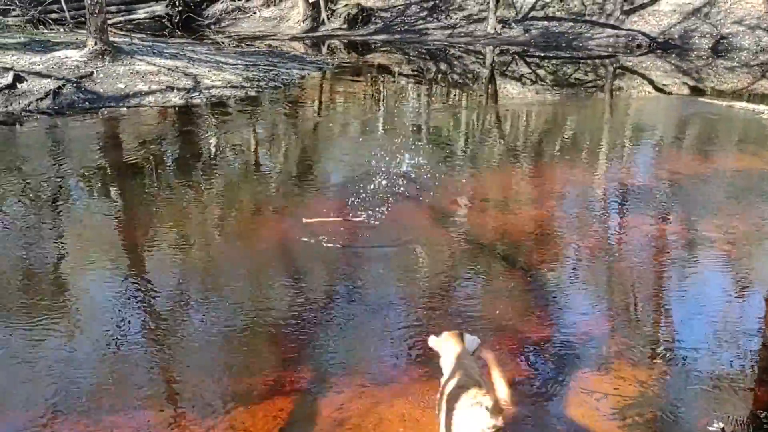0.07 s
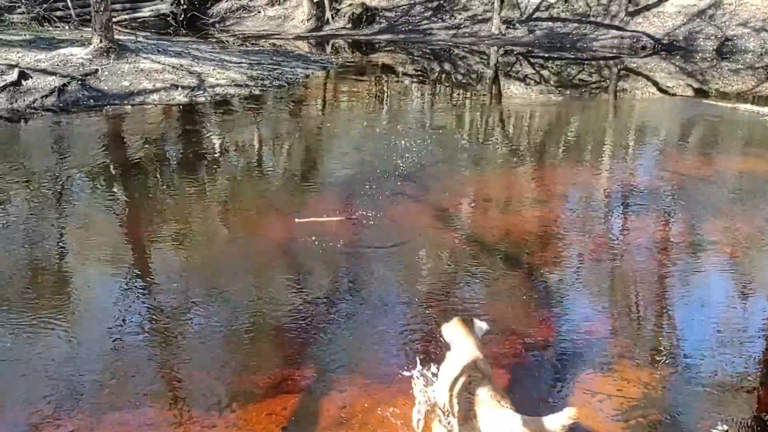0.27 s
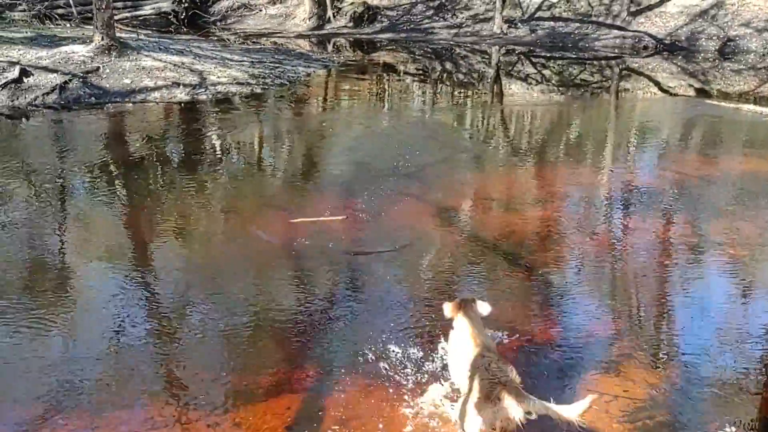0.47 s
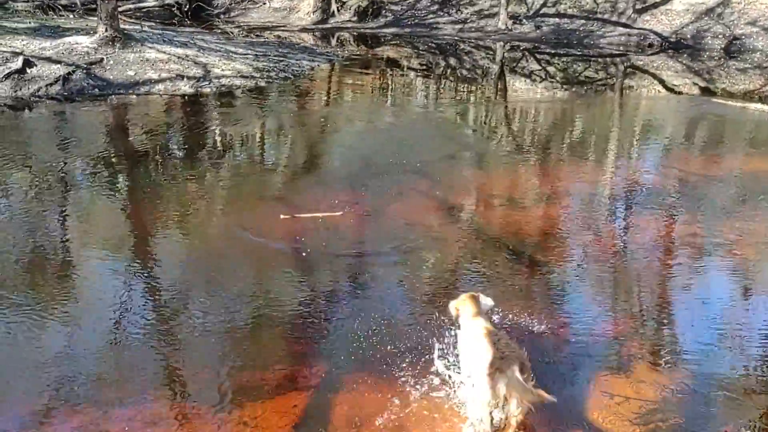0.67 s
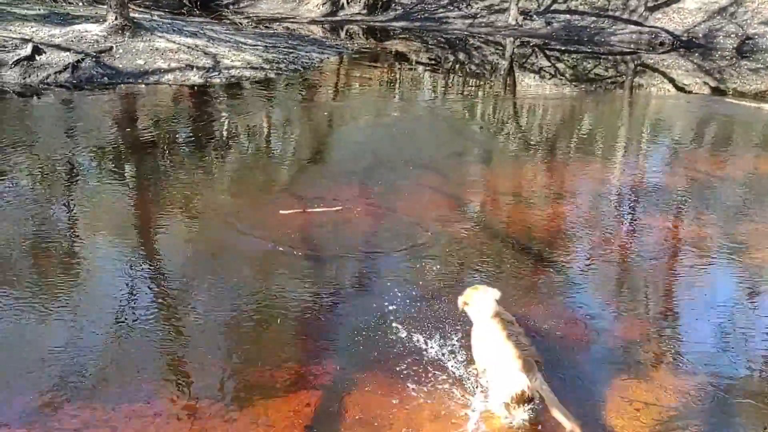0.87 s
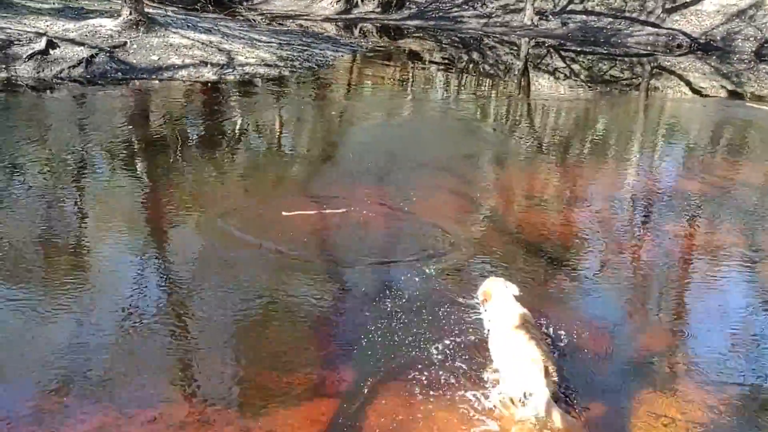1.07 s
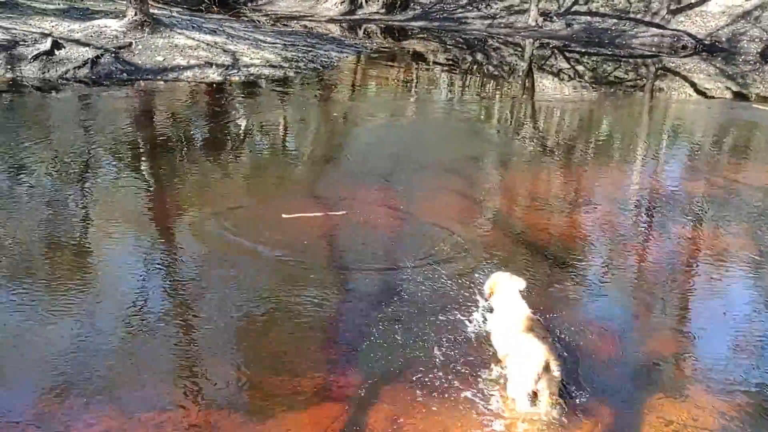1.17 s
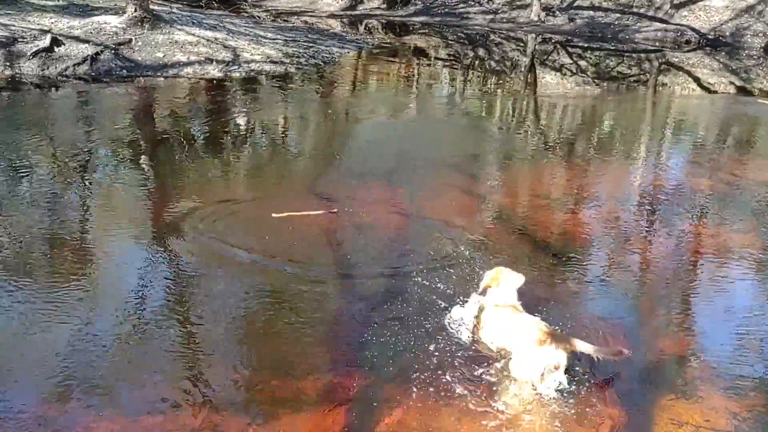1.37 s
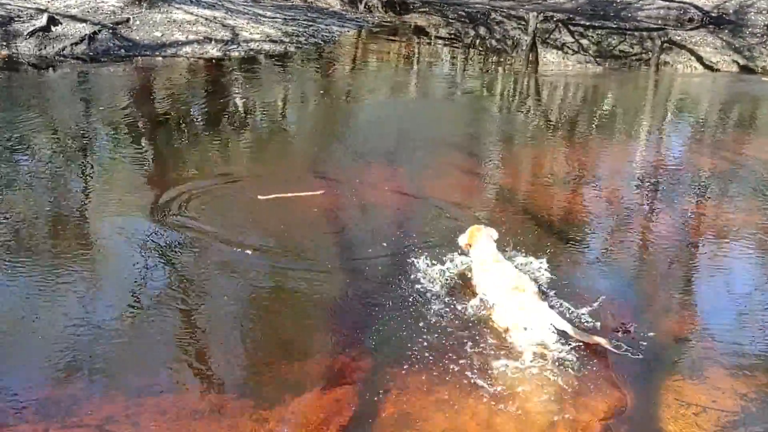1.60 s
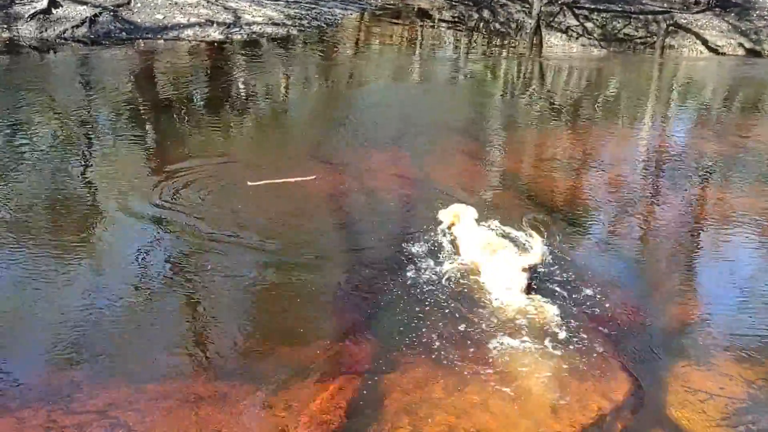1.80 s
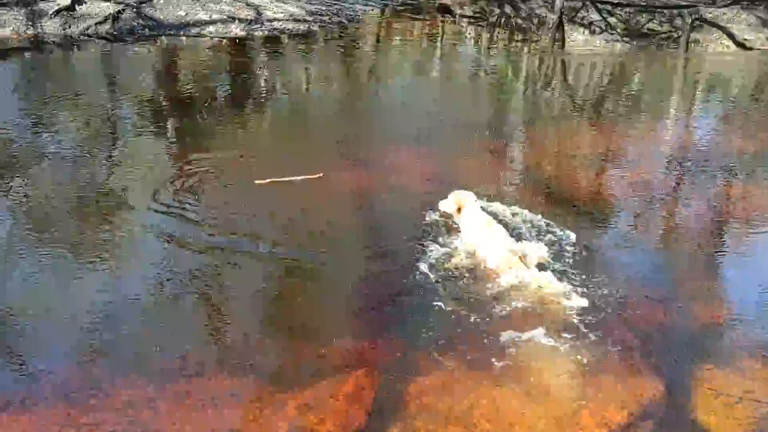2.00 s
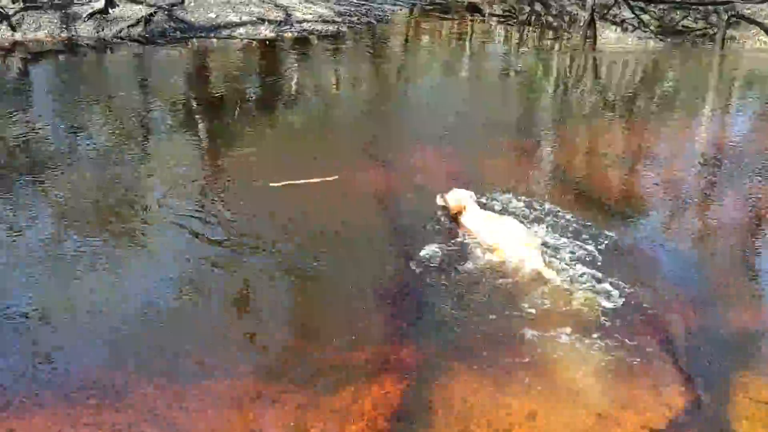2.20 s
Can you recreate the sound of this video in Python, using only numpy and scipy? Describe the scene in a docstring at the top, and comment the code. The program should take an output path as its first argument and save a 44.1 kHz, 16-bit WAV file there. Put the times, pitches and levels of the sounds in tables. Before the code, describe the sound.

A dog bounds through river shallows with a sharp splash, then sloshes and gurgles into swimming

```python
"""On a calm river, a dog bounds from the shallows and starts to swim.
Paws slap the surface as short bursts of filtered noise; trapped air rings as dying, gliding sines.
Mist, patter, drips and churn are random grains through resonators; sloshing is many gliding bubbles.
The banks return a faint echo by convolution with decaying noise, over a steady hush of shaped noise."""
import sys
import numpy as np
from scipy import signal
from scipy.fft import rfft, irfft
from scipy.io import wavfile

SR = 44100
rng = np.random.default_rng(int(sys.argv[2]) if len(sys.argv) > 2 else 0)


def to_wav(s):
    """Save 16-bit WAV."""
    ch = np.atleast_2d(s).T  # columns
    pcm = np.round(np.clip(ch, -1, 1) * 32767)  # PCM
    wavfile.write(sys.argv[1], SR, pcm.astype(np.int16))


N = 99225
TIME = np.arange(N) / SR   # s
ONSET_CYCLES = 0.87   # cycles for a bubble to reach full swing
MEAN_RISE, GLIDE_SPREAD = 0.091, 0.17   # share of pitch gained over one t60, and its scale of variation


def from_db(db):
    """Amplitude gain follows the decibel law, 20 dB per factor of ten."""
    return 10 ** (np.asarray(db) / 20)


def rms_one(x):
    """Normalisation to unit mean square power."""
    return x / np.sqrt(np.mean(x ** 2) + 1e-20)


def level(rows):
    """Envelope: gain over time, interpolated in decibels between (s, dB) points."""
    return from_db(np.interp(TIME, *np.transpose(rows)))


def at_hz(points, hz):
    """Spectral colour in dB, interpolated on a logarithmic frequency axis."""
    point_hz, db = np.transpose(points)
    return np.interp(np.log(hz), np.log(point_hz), db)


def band_pass(x, order, edges_hz):
    """Band limitation by a Butterworth filter."""
    return signal.sosfilt(signal.butter(order, edges_hz, "band", fs=SR, output="sos"), x)


def band_noise(edges_hz):
    """Band-limited white noise of unit power."""
    return rms_one(band_pass(rng.standard_normal(N), 2, np.sort(edges_hz)))


def burst(start, attack, decay):
    """Transient envelope: a straight rise, then an exponential fall; all times in s."""
    age = TIME - start
    rise = np.clip(age / attack, 0, 1)
    return rise * np.exp(-np.clip((age - attack) / decay, 0, 60))


def grains(colour, per_s, cycles, spread_db, count):
    """Impulsive excitation of resonators: random births ring at count pitches, losing 60 dB in cycles."""
    out = np.zeros(N)
    for hz in np.geomspace(colour[0][0], colour[-1][0], count):
        born = rng.random(N) < per_s / count / SR
        sizes_db = spread_db * np.minimum(rng.exponential(1, N), 3.5)
        sizes = from_db(sizes_db) * rng.choice([-1, 1], N)
        # A pole pair just inside the unit circle sets the pitch and the decay.
        radius = from_db(-60 * hz / (cycles * SR))
        angle = 2 * np.pi * hz / SR
        poles = [1, -2 * radius * np.cos(angle), radius * radius]
        rings = signal.lfilter([1, -1], poles, born * sizes + 1e-18)
        rings = band_pass(rings, 1, [hz / 2, min(hz * 2, SR / 3)])
        # Log-spaced bands widen with pitch: sqrt(hz) turns dB per Hz into band amplitude.
        out += from_db(at_hz(colour, hz)) * np.sqrt(hz) * rms_one(rings)
    return rms_one(out)


def open_air():
    """Stationary random noise: the steady hush of the riverside, coloured in the frequency domain."""
    # hush of the air: (frequency [Hz], relative level [dB])
    floor_colour = [(25, 15), (60, 1.5), (120, -1), (300, -23.5), (900, -21), (3000, 3), (8000, -12)]
    hz = np.maximum(np.fft.rfftfreq(N, 1 / SR), 1)
    spectrum = rfft(rng.standard_normal(N)) * from_db(at_hz(floor_colour, hz))
    return from_db(-54.5) * rms_one(irfft(spectrum, N))


def mist():
    """Superposed resonances: fine mist fizzes as many tiny, high, lightly damped grains."""
    # swell of the mist: (time [s], level before trim [dB])
    mist_level = [(0, -67), (.19, -63.5), (.26, -47), (.35, -60.5), (.45, -54.5), (.54, -56), (.6, -53.5),
                  (.67, -49.5), (.8, -59), (.99, -56), (1.21, -66), (1.29, -51.5), (1.38, -59),
                  (1.47, -49.5), (1.57, -54), (1.66, -48.5), (1.8, -54.5), (1.88, -58), (1.97, -55.5),
                  (2.25, -60)]
    # colour of the mist: (frequency [Hz], relative level [dB per Hz])
    mist_colour = [(4200, -6), (5300, -9), (5800, -7.5), (6500, -0.5), (7200, 1), (7900, -7)]
    fizzing = grains(mist_colour, per_s=3600, cycles=180, spread_db=5.0, count=28)
    return from_db(-1.5) * level(mist_level) * fizzing


def falling_drops():
    """Damping sets the character: dense drops patter, while sparse, longer-ringing ones drip clearly."""
    # swell of the falling spray: (time [s], level before trim [dB])
    spray_level = [(0, -50), (.13, -52.5), (.19, -50), (.25, -31.5), (.29, -48), (.35, -48), (.5, -48.5),
                   (.63, -40), (.7, -44.5), (.79, -45.5), (.89, -50), (.95, -41.5), (1.02, -42),
                   (1.22, -47.5), (1.44, -44), (1.55, -44.5), (1.66, -37), (1.74, -42), (1.97, -45.5),
                   (2.25, -49.5)]
    # colour of the patter: (frequency [Hz], relative level [dB per Hz])
    spray_colour = [(1150, 5.5), (1450, -3.5), (1800, -10.5), (2250, 7.5), (2600, -4.5), (3000, -1),
                    (3650, -1.5), (4100, -8.5)]
    # colour of the clear drips: (frequency [Hz], relative level [dB per Hz])
    drip_colour = [(1000, -3.5), (1400, 2.5), (2400, -1), (3800, 2.5)]
    patter = from_db(-3.5) * grains(spray_colour, per_s=4200, cycles=32.5, spread_db=1.5, count=64)
    drips = from_db(-7.5) * grains(drip_colour, per_s=280, cycles=85, spread_db=4.5, count=30)
    return level(spray_level) * (patter + drips)


def gurgles():
    """Bubble resonance: size sets each pitch, and the moving surface bends it up or down."""
    # colour of the sloshing: (frequency [Hz], relative level [dB per Hz])
    slosh_colour = [(350, -29.5), (420, -4.5), (500, 2), (740, -0.5), (920, 3.5), (1130, -7), (1420, -5),
                    (1900, -14)]
    bubbles_per_s, ring_cycles, spread_db = 720, 47.5, 0.5
    lowest_hz, highest_hz = slosh_colour[0][0], slosh_colour[-1][0]
    count = int(bubbles_per_s * N / SR)
    out = np.zeros(N + SR)
    for k, (when, size, strength, bend, turn) in enumerate(rng.random((count, 5))):
        hz = lowest_hz * (highest_hz / lowest_hz) ** size
        t60 = min(ring_cycles / hz, .5)
        start = int((k + when) * N / count)
        age = np.arange(int(t60 * SR)) / SR
        rise = MEAN_RISE + 2 * GLIDE_SPREAD * (2 * bend - 1)
        strength_db = spread_db * min(-np.log(1 - strength), 3)
        gain = hz * from_db(at_hz(slosh_colour, hz) + strength_db)
        swing = np.minimum(age * hz / ONSET_CYCLES, 1) * np.exp(-np.log(1000) * age / t60)
        cycles = turn + hz * (age + rise * age ** 2 / (2 * t60))   # turn is the starting phase
        out[start:start + len(age)] += gain * swing * np.sin(2 * np.pi * cycles)
    return rms_one(out[:N])


def slosh():
    """Amplitude modulation: the gurgling swells as water sloshes round the body."""
    # swell of the sloshing: (time [s], level before trim [dB])
    slosh_level = [(0, -60.5), (.19, -70.5), (.26, -51), (.38, -65.5), (.48, -56.5), (.6, -54), (.8, -50.5),
                   (.94, -49.5), (1.05, -46.5), (1.31, -49), (1.43, -43), (1.55, -46), (1.66, -36),
                   (1.71, -43.5), (1.81, -39.5), (1.86, -43.5), (1.98, -44.5), (2.16, -46.5), (2.25, -53.5)]
    return from_db(-0.5) * level(slosh_level) * gurgles()


def churn():
    """Heavily damped low resonances: the legs churn the water below into eddies."""
    # swell of the churning: (time [s], level before trim [dB])
    churn_level = [(0, -73), (.19, -76), (.28, -58), (.36, -69.5), (.7, -65), (1.25, -62.5), (1.39, -62.5),
                   (1.46, -49.5), (1.55, -53.5), (1.66, -40.5), (1.75, -57.5), (1.85, -58.5), (1.96, -48.5),
                   (2.04, -53.5), (2.25, -61.5)]
    # colour of the churning: (frequency [Hz], relative level [dB per Hz])
    churn_colour = [(60, -16), (100, -6), (160, 7.5), (260, 7.5), (350, -1), (480, -18.5)]
    eddies = grains(churn_colour, per_s=380, cycles=5.0, spread_db=4, count=14)
    return from_db(-2.5) * level(churn_level) * eddies


def banks(x):
    """Diffuse reflection: banks and trees scatter a dull, faint echo, convolved as decaying noise."""
    delay_s, attack_s, t60_s = .012, 0.00057, 0.43
    tail = band_noise((200, 4700)) * burst(delay_s, attack_s, t60_s / np.log(1000))
    unit_energy_tail = tail / np.sqrt(np.sum(tail ** 2))
    return from_db(-22) * signal.fftconvolve(x, unit_energy_tail)[:N]


def slaps():
    """Impact noise: paws and lumps of water excite a hollow body, a splash and a fizz under one burst."""
    # hits on the surface: (time [s], splash level [dB], decay [s],
    #   body level re splash [dB], fizz level re splash [dB])
    slap_rows = [(0.0247, -41.5, 0.0032, -19, -19), (0.1047, -42, 0.012, -8, -3),
                 (0.1807, -42, 0.0024, -22, -14), (0.2066, -35.5, 0.011, -11.5, -5.5),
                 (0.2289, -40.5, 0.0047, 2, -15), (0.461, -56, 0.0053, 11.5, 7.5),
                 (0.555, -32, 0.0056, -7.5, -5.5), (0.596, -40.5, 0.0095, -3.5, -15),
                 (0.628, -46, 0.0059, 8, -42), (0.661, -45.5, 0.0086, -29, 0.5),
                 (0.683, -39, 0.011, -30, -17), (0.818, -44, 0.029, 4, -7), (0.899, -44, 0.0073, 3, -23),
                 (0.918, -39.5, 0.014, 5, -30), (0.935, -43, 0.0099, 5.5, -17),
                 (1.06, -39.5, 0.0045, -7, -9.5), (1.129, -41.5, 0.019, 0, -10.5),
                 (1.256, -40, 0.017, -19, -4), (1.3, -45, 0.0057, 11, -4), (1.431, -38, 0.026, -2.5, -30),
                 (1.484, -40.5, 0.016, 7, -15), (1.6382, -40.5, 0.02, -9, -6), (1.673, -34, 0.003, -9, -18),
                 (1.8241, -36.5, 0.0084, 5, -16), (1.9395, -36.5, 0.0076, -16, -30),
                 (1.9585, -40.5, 0.016, 2.5, -10)]
    body = band_noise((516, 1400))
    splash = band_noise((1240, 3500))
    fizz = band_noise((4940, 7900))
    rise_share = 0.12   # attack as a share of the decay
    out = np.zeros(N)
    for start, db, decay, body_db, fizz_db in slap_rows:
        mixture = splash + from_db(body_db) * body + from_db(fizz_db) * fizz
        out += from_db(db) * burst(start, rise_share * decay, decay) * mixture
    return out


def bubble(start, db, hz, t60, rise):
    """Damped oscillation of an air pocket: a dying sine that gains rise of its pitch over one t60."""
    age = np.clip(TIME - start, 0, 2 * t60)
    phase = 2 * np.pi * hz * (age + rise * age ** 2 / (2 * t60))
    return from_db(db) * burst(start, ONSET_CYCLES / hz, t60 / np.log(1000)) * np.sin(phase)


def air_pockets():
    """Volume resonance of trapped air: plunging legs make deep gulps, and large bubbles higher plops."""
    # air pockets under the legs: (time [s], level [dB], pitch [Hz], t60 [s],
    #   pitch gained over one t60 [share])
    gulp_rows = [(.236, -41, 120.8, 0.034, -0.18), (0.278, -51, 307, 0.1, -0.0069),
                 (0.457, -51, 128, 0.02, 0.16), (0.554, -38.5, 175, 0.2, 0.64),
                 (0.622, -38.5, 157.6, 0.073, 0.019), (.821, -33.5, 248, 0.035, 0.13),
                 (.99, -46.5, 253, 0.068, 0.22), (1.298, -33.5, 104, 0.21, .04),
                 (1.298, -36.5, 238, 0.023, .1), (1.574, -35, 212, 0.035, -0.055),
                 (1.598, -45, 167, .04, 0.43), (1.622, -37, 210, 0.028, 0.14),
                 (1.872, -38.5, 244, 0.037, .1), (1.876, -47.5, 150, 0.06, 0.09),
                 (1.917, -48, 237, .04, .1)]
    # single large bubbles: (time [s], level [dB], pitch [Hz], t60 [s])
    plop_rows = [(.209, -29, 1010, 0.043), (.229, -34.5, 884, 0.059), (0.312, -34.5, 1480, 0.037),
                 (0.491, -42, 558, 0.096), (.558, -30.5, 2556, 0.062), (.597, -29.5, 1460, 0.047),
                 (.622, -38.5, 720, .035), (0.659, -29.5, 973, 0.045), (.757, -40, 574, 0.14),
                 (.817, -32.5, 927, 0.03), (.85, -39, 710, 0.064), (.868, -33, 496, 0.056),
                 (.899, -36, 1027, 0.043), (0.9183, -37, 878, 0.11), (1.005, -40, 945, 0.047),
                 (1.025, -33, 5340, 0.0092), (1.058, -28.5, 926, 0.016), (1.187, -36, 913, 0.079),
                 (1.239, -34.5, 756, 0.036), (1.3411, -31.5, 1370, 0.038), (1.374, -35.5, 507, 0.079),
                 (1.402, -35, 499, 0.11), (1.502, -38, 787, 0.02), (1.634, -29.5, 490, 0.036),
                 (1.648, -30.5, 640, 0.066), (1.671, -27.5, 880, 0.016), (1.761, -37, 972, 0.1),
                 (1.808, -25, 535, 0.022), (1.878, -33, 423, 0.034), (1.947, -32, 455, 0.017)]
    rises = rng.normal(MEAN_RISE, GLIDE_SPREAD / 2, len(plop_rows))
    gulps = sum(bubble(*row) for row in gulp_rows)
    plops = sum(bubble(*row, rise) for row, rise in zip(plop_rows, rises))
    return gulps + plops


def smack():
    """Modal ringing: one flat hit traps small bubbles that crack almost at once, with a noise splash."""
    # cracking bubbles: (delay after the hit [s], pitch [Hz], level before trim [dB], t60 [s])
    ring_rows = [(0, 1066, -1.5, .014), (0, 1400, -9.5, .022), (0, 2090, 1.5, .016),
                 (.0005, 2520, 0.5, .016), (.0014, 3030, -10, .017), (.002, 3720, -7.5, .013),
                 (.0006, 5100, -15.5, .009), (.0005, 5650, -10.5, .009), (.0006, 6090, -6, .01),
                 (.001, 6930, -11, .014), (.001, 7450, -9, .012)]
    hit_s, attack_s, splash_decay_s = .2421, 0.0011, .002
    rings = np.zeros(N)
    for delay, hz, db, t60 in ring_rows:
        start = hit_s + delay
        swing = burst(start, attack_s, t60 / np.log(1000))
        rings += from_db(db) * swing * np.sin(2 * np.pi * hz * (TIME - start))
    splash = burst(hit_s, attack_s, splash_decay_s) * band_noise((1400, 3600))
    return from_db(-15) * rings + from_db(-22) * splash


def scene():
    """Linear superposition of the water, its echo and the air, in one channel."""
    stirred_water = mist() + falling_drops() + slosh() + churn()
    water = stirred_water + slaps() + air_pockets() + smack()
    return (water + banks(water) + open_air())[None]


def record(dry):
    """Linear filtering by a small microphone: thin bass, resonant peaks and dips, and a cut top."""
    # microphone colour: (frequency [Hz], width [Hz], gain [dB])
    microphone = [(1155, 172, -6), (2950, 187, 5), (4265, 2270, -13)]
    x = signal.sosfilt(signal.butter(2, 102, "high", fs=SR, output="sos"), dry)
    for hz, width, db in microphone:
        resonance = signal.lfilter(*signal.iirpeak(hz, hz / width, fs=SR), x)
        x = x + (from_db(db) - 1) * resonance
    return signal.sosfilt(signal.butter(32, 7950, fs=SR, output="sos"), x)   # steep low-pass


dry = scene()
out = record(dry)
to_wav(out)
```